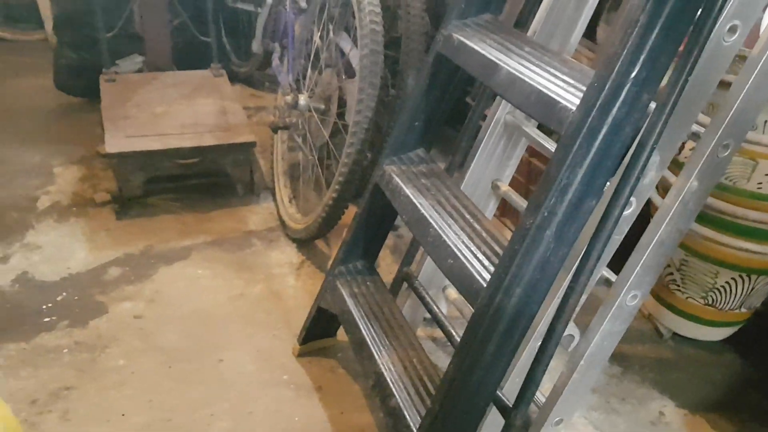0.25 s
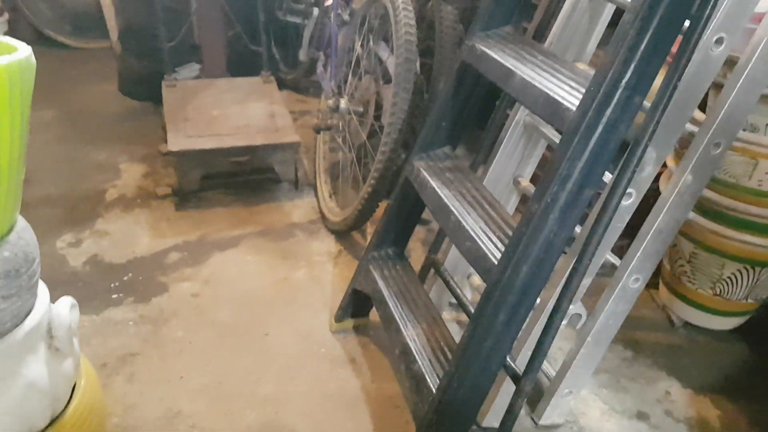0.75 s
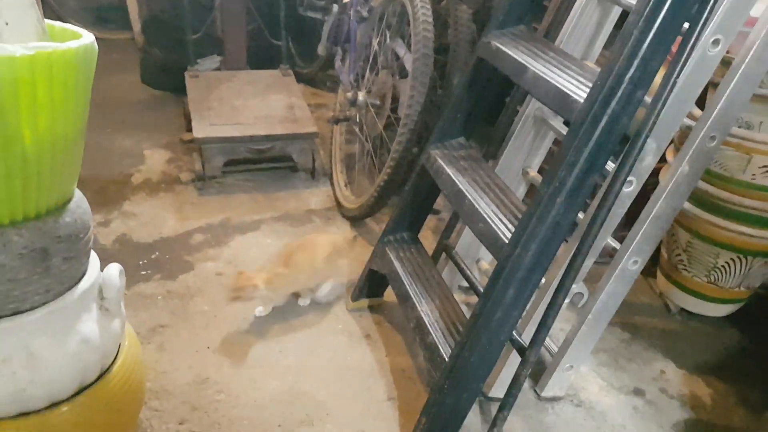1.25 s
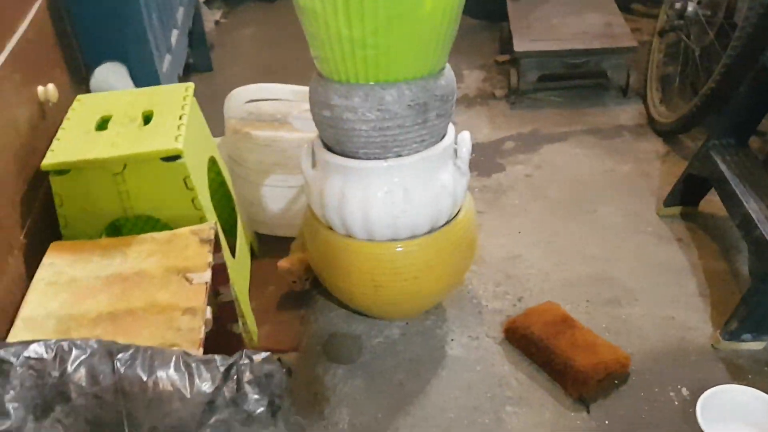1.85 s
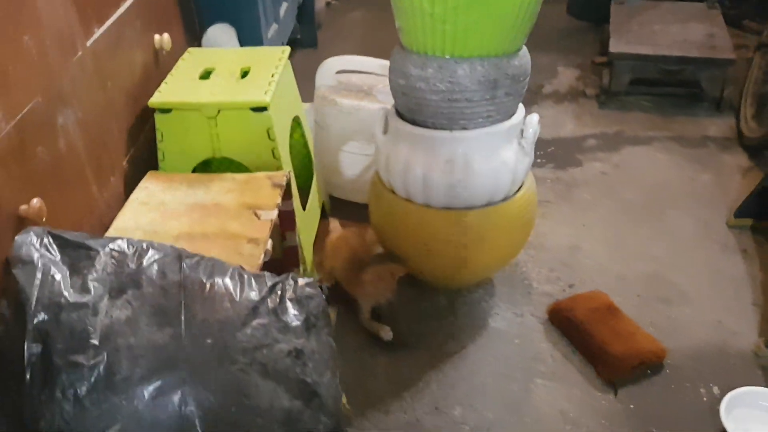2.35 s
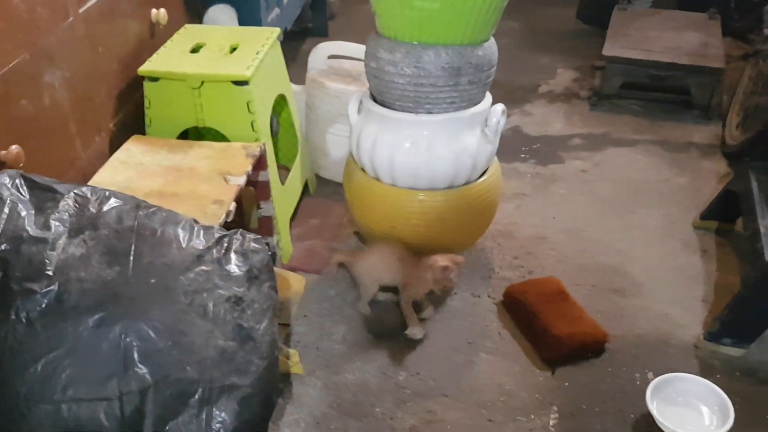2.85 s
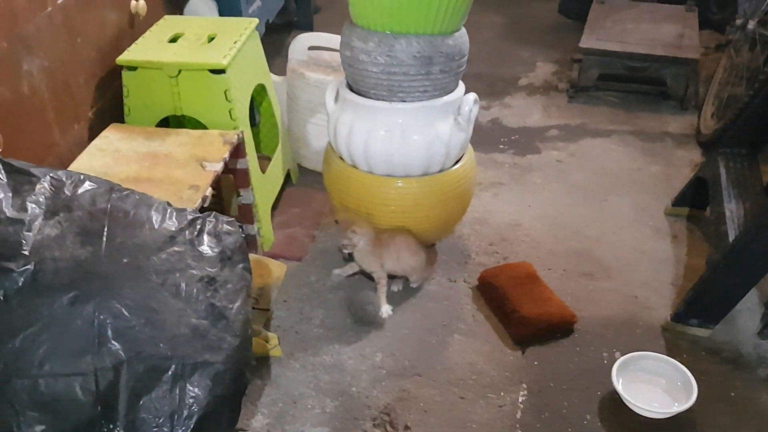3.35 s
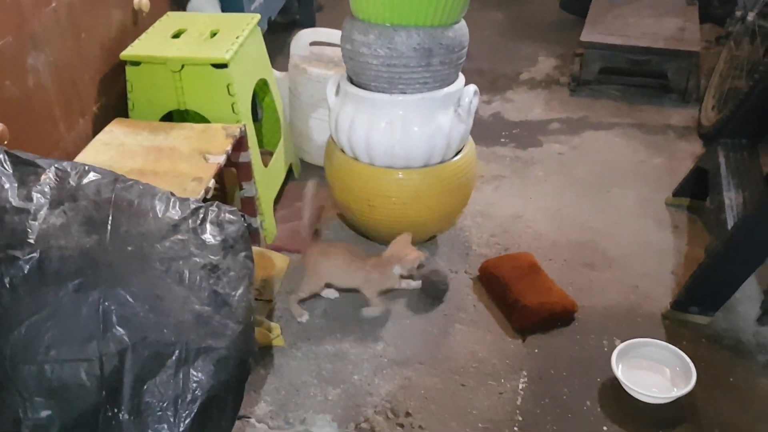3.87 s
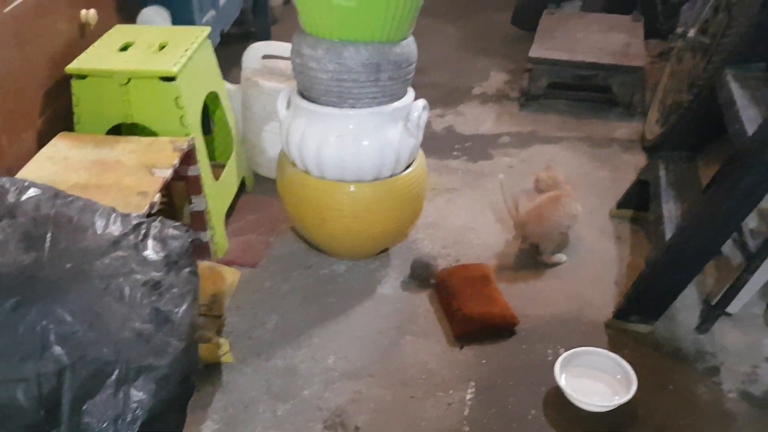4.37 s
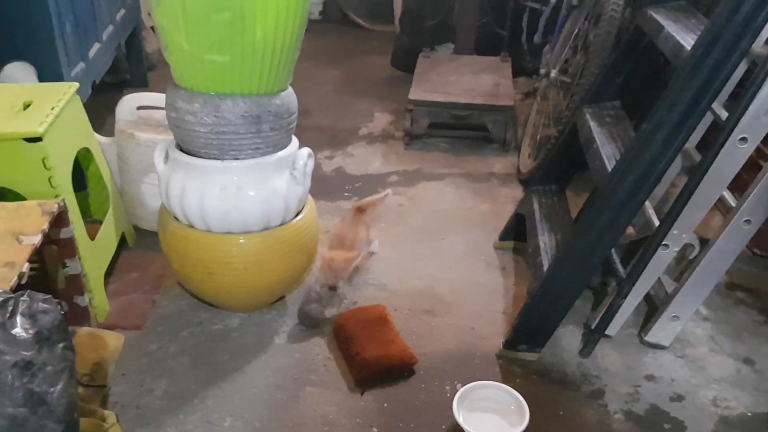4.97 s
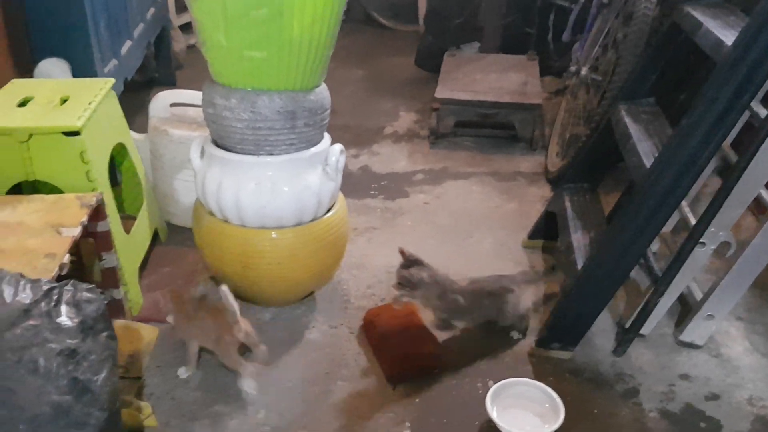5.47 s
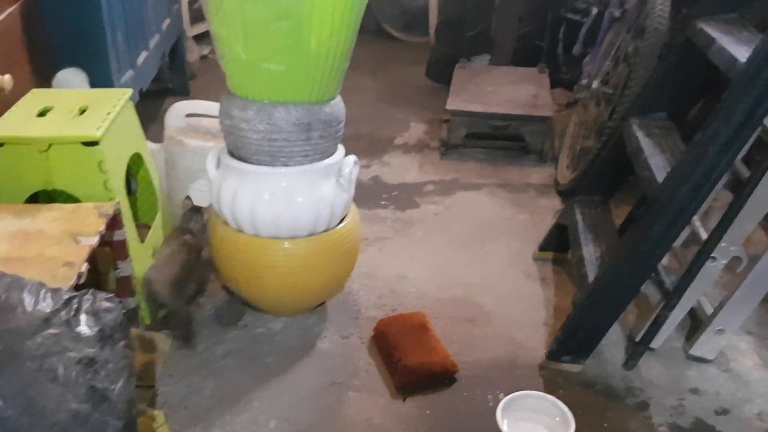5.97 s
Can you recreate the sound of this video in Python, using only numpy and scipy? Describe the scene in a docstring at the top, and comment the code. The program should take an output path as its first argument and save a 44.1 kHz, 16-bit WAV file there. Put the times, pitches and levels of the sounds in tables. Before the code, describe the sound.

Faint taps and scratches of kittens chasing over a gritty floor, ending with two loud knocks, the first ringing, the second dull and booming.

```python
"""Faint room noise, then kittens chasing over the concrete floor of a small, hard-walled storeroom.
Pads and claws tap (short clicks) and scuff on grit (grainy noise bursts); the walls echo them.
Late on, something hollow clatters further off and rings briefly; a dull, booming knock follows.
Both are decaying modes plus bands of noise. A hand-held phone with two ports listens."""
import sys
import numpy as np
from scipy import signal
from scipy.fft import rfft, irfft
from scipy.io import wavfile
from scipy.ndimage import uniform_filter1d

SR = 44100
rng = np.random.default_rng(int(sys.argv[2]) if len(sys.argv) > 2 else 0)


def materialize(psi):
    """Save the field psi as 16-bit PCM at rate SR to the path in sys.argv[1].

    A 1-D psi becomes a single channel; in a 2-D psi each row is a channel.
    """
    bounded = np.clip(np.atleast_2d(psi).T, -1, 1)
    quanta = np.round(bounded * 32767).astype(np.int16)
    wavfile.write(sys.argv[1], SR, quanta)


N = 274125
TIME_S = np.arange(N) / SR
SCUFF_PAN_DB = -2.5


def undb(db):
    """Decibels to gain."""
    return 10 ** (np.asarray(db) / 20)


def unit(x):
    """Scale to rms 1."""
    return x / np.sqrt(np.mean(x ** 2))


def pan(db):
    """Stereo gains for a level difference, left minus right."""
    return undb(np.array([[db], [-db]]) / 2)


def bins_hz(size):
    """FFT bin frequencies, floored at 1 Hz."""
    return np.maximum(np.fft.rfftfreq(size, 1 / SR), 1)


def along(hz, table, column=1):
    """Read one column of a table on a log-frequency axis."""
    rows = np.array(table, float)
    return np.interp(np.log(hz), np.log(rows[:, 0]), rows[:, column])


def add(out, start_s, sound):
    """Mix a sound in at a time."""
    i = int(start_s * SR)
    out[:, i:i + sound.shape[1]] += sound[:, :N - i]


def diffuse(hz, alike_below_hz=510):
    """Spectrum of noise from all round: the two ports agree only on long waves."""
    coherence = 0.92 / (1 + (hz / alike_below_hz) ** 2)
    mid, side = rng.standard_normal((2, len(hz))) + 1j * rng.standard_normal((2, len(hz)))
    return np.sqrt(1 + coherence) * mid + np.sqrt(1 - coherence) * side * np.array([[1], [-1]])


def uneven(hz, depth_db, spacing_hz):
    """Gain with chance peaks and valleys, as from many overlapping resonances."""
    knots = np.arange(256)
    return undb(depth_db * np.interp(hz / spacing_hz, knots, rng.standard_normal(len(knots))))


def hump(hz, centre_hz, octaves):
    """Contact spectrum: a bell on a pink slope, dulled by the phone microphone's dip near 8.5 kHz."""
    # Microphone treble dip. Each row: frequency in Hz, gain in dB.
    mic_colour = [(8200, 2.5), (8900, -3.5), (15000, 4.5)]
    bell = np.exp(-(np.log2(hz / centre_hz) / (2 * octaves)) ** 2)
    return bell / np.sqrt(hz) * undb(along(hz, mic_colour))


def wash(table, size=49152, bands=26):
    """Crowded modes or echoes: noise bands, each swelling and dying at its own pace; energy 1."""
    t, hz = TIME_S[:size], bins_hz(size)
    noise = diffuse(hz) * uneven(hz, depth_db=4.5, spacing_hz=73.7)
    colour = undb(along(hz, table))
    centres_hz = np.geomspace(70, 16000, bands)
    band_index = np.interp(np.log(hz), np.log(centres_hz), np.arange(bands))
    out = 0
    for k, centre_hz in enumerate(centres_hz):
        t60_s, swell_s = along(centre_hz, table, column=2), along(centre_hz, table, column=3)
        weight = colour * np.maximum(1 - abs(band_index - k), 0)
        envelope = -np.expm1(-t / swell_s) * np.exp(-np.log(1000) * t / t60_s)
        band = irfft(noise * weight, size) * envelope
        out = out + band * np.linalg.norm(weight) / np.linalg.norm(band, axis=1, keepdims=True)
    return unit(out) / np.sqrt(size)


def ring(modes, swell_cycles, lag_s, scatter_rad_per_khz):
    """Modes build up, then decay; reflections scatter the phase of short waves at each port."""
    t, out = TIME_S[:SR], 0
    for hz, db, t60_s in modes:
        scatter_rad = scatter_rad_per_khz * min(hz / 1000, 2) * rng.standard_normal()
        port_rad = (scatter_rad + np.pi * hz * lag_s) * np.array([[-1], [1]])
        path_rad = hz / 200 * rng.standard_normal()
        swell = -np.expm1(-(t * hz / swell_cycles) ** 2)
        decay = np.exp(-np.log(1000) * t / t60_s)
        out = out + undb(db) * swell * decay * np.sin(2 * np.pi * hz * t + path_rad + port_rad)
    return out


def tap(centre_hz, octaves, lag_s=0.00006, size=1024):
    """One short contact: a resonant click that reaches the right port first."""
    hz = bins_hz(size)
    gain = hump(hz, centre_hz, octaves)
    # folded cepstrum: minimum phase, no pre-ring
    cepstrum = irfft(np.log(gain / gain.max() + undb(-42)))
    cepstrum[1:size // 2] *= 2
    cepstrum[size // 2 + 1:] = 0
    delay_rad = 2 * np.pi * hz * np.array([[lag_s], [0]])
    click = irfft(np.exp(rfft(cepstrum) - 1j * delay_rad))
    return click / abs(click).max()


def air(level_db=-63.5):
    """Steady room noise: still air and distant rumble."""
    # Noise spectrum. Each row: frequency in Hz, relative density in dB.
    spectrum = [(20, -22), (50, -11), (110, -11), (190, -9.5), (380, -3), (600, -5), (1200, -11.5),
                (1900, -13.5), (2600, -16), (4200, -20.5), (6200, -24), (8100, -20.5), (9000, -30.5),
                (15800, -22)]
    hz = bins_hz(N)
    noise = unit(irfft(diffuse(hz) * undb(along(hz, spectrum)), N))
    return noise * undb(level_db) * pan(-1.9)


def handling(centre_hz=82, octaves=0.58, gain_db=-3.5):
    """Low rumble of the phone shifting in the hand, with a low swell as the clatter strikes near 5.2 s."""
    # Rumble envelope. Each row: time in seconds, relative level in dB.
    levels = [(0.0, -78.5), (1.9, -79), (2.89, -82), (3.73, -69.5), (3.93, -77), (4.85, -73.5), (4.97, -80),
              (5.22, -68), (5.8, -74)]
    hz = bins_hz(N)
    rumble = unit(irfft(diffuse(hz) * hump(hz, centre_hz, octaves), N))
    return rumble * undb(gain_db + np.interp(TIME_S, *np.transpose(levels)))


def room_echo(sound):
    """Hard walls return a dense tail; the treble dies first."""
    # Echo bands. Each row: frequency in Hz, relative density in dB, T60 and swell in seconds.
    echo_bands = [(100, -8, 0.56, .008), (1000, -5.5, 0.6, 0.0089), (5030, -3.5, 0.33, 0.00098),
                  (15500, 5, 0.083, .003)]
    return signal.fftconvolve(sound, wash(echo_bands), axes=1)[:, :N]


def clatter(start_s=5.208, rebound_after_s=0.028, rebound_top_hz=2200, rebound_decay_s=0.037):
    """A hollow thing is struck and rebounds; its ring arrives mostly by way of the walls."""
    # Strong modes. Each row: frequency in Hz, relative level in dB, T60 in seconds.
    modes = [(211, -24, 0.18), (345, -30, 0.33), (406, -30, 0.8), (574, -27, 0.36), (624, -30, 0.36),
             (704, -40, 1.0), (779, -32, 1.0), (835, -28, 0.52), (859, -21, 0.3), (893, -28, 0.43),
             (911, -26, 0.3), (934, -21, 0.3), (967, -32, 0.52), (1048, -25, 0.3), (1123, -20, 0.3),
             (1168, -30, 0.43), (1202, -24, 0.36), (1262, -29, 0.36), (1346, -27, 0.3), (1383, -29, 0.3),
             (1420, -34, 0.65), (1561, -32, 0.36), (1667, -32, 0.3), (1696, -35, 0.52), (1794, -34, 0.36),
             (1823, -36, 0.43), (1888, -34, 0.36), (2096, -36, 0.43), (2122, -34, 0.3), (2260, -34, 0.3)]
    # Weak, crowded modes. Each row: frequency in Hz, relative density in dB, T60 and swell in seconds.
    crowd = [(120, -25, 1, 0.025), (293, -14, 0.99, 0.024), (378, -4, 1, 0.0051), (680, -0.5, 1, 0.0054),
             (1220, 3, 0.72, 0.011), (1950, -5.5, 0.61, 0.038), (2720, -3, 0.49, 0.0032),
             (4600, -16.5, 0.48, 0.009), (8100, -18, 0.5, 0.0013), (8800, -26.5, 0.51, 0.00077),
             (15500, -28.5, 0.61, 0.0009)]
    out = np.zeros((2, N))
    add(out, start_s, undb(1.5) * ring(modes, swell_cycles=18.6, lag_s=0.00016, scatter_rad_per_khz=0.62))
    add(out, start_s, undb(9) * wash(crowd))
    # softer, self-damping contact: no top, short tail
    rebound = signal.sosfilt(signal.butter(2, rebound_top_hz, fs=SR, output="sos"), wash(crowd))
    damping = np.exp(-TIME_S[:rebound.shape[1]] / rebound_decay_s)
    add(out, start_s + rebound_after_s, undb(9) * rebound * damping)
    return out * pan(-1.6)


def thud(start_s=6.0555, crack_hz=2200):
    """A dull knock: a short crack, a low boom that builds up, and a rattle."""
    # Boom modes. Each row: frequency in Hz, relative level in dB, T60 in seconds.
    modes = [(168, -25, 0.33), (192.8, -14.5, 0.31), (460, -47, 0.28), (472, -36, 0.3), (491, -37, 0.23),
             (630, -41, 0.24), (781, -39.5, 0.38)]
    # Rattle bands. Each row: frequency in Hz, relative density in dB, T60 and swell in seconds.
    rattle = [(45, -53, 0.5, .01), (110, -10, 0.46, .01), (250, -7.5, 0.46, 0.014), (454, 3, 0.23, 0.0038),
              (740, -10.5, 0.3, 0.0056), (1060, -12, 0.33, 0.011), (2400, -13.5, 0.32, .001),
              (3180, -23, 0.31, .002), (4130, -36, 0.61, 0.0022), (15500, -54.5, .7, .002)]
    boom = ring(modes, swell_cycles=3.8, lag_s=-0.00021, scatter_rad_per_khz=0.24)
    out = np.zeros((2, N))
    add(out, start_s, undb(-1) * boom)
    add(out, start_s, undb(1) * wash(rattle))
    add(out, start_s + 0.0011, undb(-32) * tap(crack_hz, octaves=0.25))
    return out * pan(-1.6)


def scuff(length_s, centre_hz, octaves, grain_db=2.5, attack_share=0.045, size=16384):
    """A paw slides: grit catches quickly and unevenly, then lets go."""
    hz = bins_hz(size)
    progress = TIME_S[:size] / length_s
    roughness = unit(uniform_filter1d(rng.standard_normal(size), size=50))
    grains = unit(undb(grain_db * roughness))
    colour = hump(hz, centre_hz, octaves) * uneven(hz, depth_db=2.5, spacing_hz=218.4)
    envelope = -np.expm1(-progress / attack_share) * np.exp(-progress ** 2.34)
    return unit(irfft(diffuse(hz) * colour)) * grains * envelope


def crunch(click, grit_db=-1, decay_s=0.0061, size=1024):
    """Grains under the pad repeat a contact for a few milliseconds."""
    grains = rng.standard_normal((2, size)) * np.exp(-TIME_S[:size] / decay_s)
    grains *= undb(grit_db) / np.linalg.norm(grains, axis=1, keepdims=True)
    grains[:, 0] += 1  # the contact itself
    return undb(-3) * signal.fftconvolve(click, grains, axes=1)


def width_share(hz, pad_below_hz=1710):
    """Share of full bandwidth: soft pads are low and narrow, claws high and broad."""
    return min(hz / pad_below_hz, 1)


def scamper(level_db=-77, spread_db=5, centre_hz=4300, spread_octaves=0.55, count=60):
    """Light claw scratches at random times and pitches."""
    starts_s = rng.uniform(0.46, 6, count)
    out = np.zeros((2, N))
    for start_s, (force, pitch) in zip(starts_s, rng.standard_normal((count, 2))):
        hz = np.clip(centre_hz * 2 ** (spread_octaves * pitch), 1000, 8000)
        scratch = scuff(length_s=0.017, centre_hz=hz, octaves=0.16, size=4096)
        add(out, start_s, undb(level_db + spread_db * force) * scratch)
    return out * pan(-1.5)


def gallop(start_s=4.015, stride_s=0.11, level_db=-67, spread_db=1, strides=4):
    """A kitten bounds in light, even strides, one scuff each."""
    out = np.zeros((2, N))
    for k, force in enumerate(rng.standard_normal(strides)):
        step = scuff(length_s=0.046, centre_hz=3300, octaves=1, size=8192)
        add(out, start_s + k * stride_s, undb(level_db + spread_db * force) * step)
    return out * pan(SCUFF_PAN_DB)


def slides(scuff_octaves=1.27, scratch_octaves=0.24, squeak_octaves=0.066, squeak_db=-68):
    """Sliding friction: broad paw scuffs, narrower claw scratches, thin squeaks."""
    # Paws on grit. Each row: start and length in seconds, level in dB, pitch in Hz.
    scuffs = [(0.62, 0.2, -61, 1560), (0.754, 0.06, -53.5, 1630), (1.246, 0.17, -65.5, 2400),
              (1.634, 0.16, -63, 1690), (1.804, 0.056, -58.5, 1970), (2.258, 0.1, -64.5, 1690),
              (2.406, 0.11, -64, 3400), (2.604, 0.12, -63.5, 1690), (2.673, 0.072, -54.5, 1910),
              (3.069, 0.048, -64, 2400), (3.432, 0.06, -60, 4470), (3.564, 0.07, -59, 4870),
              (3.773, 0.05, -53.5, 2350), (3.897, 0.06, -61.5, 3240), (4.553, 0.084, -63, 3900),
              (4.649, 0.1, -59, 4400), (5.106, 0.072, -55.5, 3380), (5.144, 0.038, -55, 580),
              (5.775, 0.014, -52.5, 380), (5.865, 0.038, -55.5, 1800), (5.999, 0.15, -47, 700)]
    # Dragged claws. Each row: start and length in seconds, level in dB, pitch in Hz.
    scratches = [(2.179, 0.043, -55.5, 5830), (3.671, 0.031, -64, 6650)]
    # Things being brushed. Each row: start and length in seconds, pitch in Hz.
    squeaks = [(0.1, 0.021, 3350), (2.074, 0.036, 2560), (2.615, 0.14, 2740), (3.077, 0.027, 3060),
               (3.246, 0.021, 2990), (5.845, 0.029, 2850)]
    out = np.zeros((2, N))
    for start_s, length_s, db, hz in scuffs:
        add(out, start_s, undb(db) * scuff(length_s, hz, scuff_octaves * width_share(hz)))
    for start_s, length_s, db, hz in scratches:
        add(out, start_s, undb(db) * scuff(length_s, hz, scratch_octaves))
    for start_s, length_s, hz in squeaks:
        add(out, start_s, undb(squeak_db) * scuff(length_s, hz, squeak_octaves))
    return out * pan(SCUFF_PAN_DB)


def footfalls(octaves=0.63, pan_db=-3.5):
    """Pads and claws strike gritty concrete; returns direct sound and echo send."""
    # Floor taps. Each row: start in seconds, relative level in dB, pitch in Hz, echo send in dB.
    taps = [(0.4196, -35.5, 6000, -1.5), (0.624, -46, 1630, 6), (0.6609, -37.5, 1050, -16),
            (0.7698, -37.5, 1470, 4), (0.7729, -37, 1300, -6), (1.2463, -40, 1680, 6),
            (1.3975, -41.5, 8500, 7), (1.746, -42, 1570, 5), (1.814, -46, 2200, -9),
            (1.845, -46.5, 1200, -12), (2.4165, -39.5, 13000, -14), (2.678, -34, 3280, 6),
            (2.68, -50.5, 523, 3), (2.9158, -41.5, 2830, 5), (3.3663, -45.5, 1120, -13),
            (3.776, -47, 553, 4), (3.905, -49, 1280, -11), (4.182, -46.5, 970, -12),
            (5.1067, -32.5, 5000, -2), (5.118, -42, 1110, -3), (5.7747, -49.5, 900, -2),
            (6.003, -47, 750, 5), (6.039, -40.5, 1250, 18)]
    direct, send = np.zeros((2, 2, N))
    for start_s, db, hz, send_db in taps:
        click = undb(db) * crunch(tap(hz, octaves * width_share(hz)))
        add(direct, start_s, click * pan(pan_db))
        add(send, start_s, click * undb(send_db))
    return direct, send


def paws(slide_send_db=-4):
    """The chase: taps and slides over light running, all echoed by the room."""
    running = scamper() + gallop()
    tapping, tap_send = footfalls()
    sliding = slides()
    send = running + tap_send + sliding * undb(slide_send_db)
    return running + tapping + sliding + room_echo(send[:1])


def scene():
    """Paws, two knocks, room noise and the holding hand."""
    return paws() + clatter() + thud() + air() + handling()


def record(dry, top_hz=15850, dc_offset=-0.0004):
    """The phone cuts the top; its signal rests slightly off zero."""
    lowpass = signal.ellip(10, 0.2, 80, top_hz, fs=SR, output="sos")
    return signal.sosfilt(lowpass, dry + dc_offset)


dry = scene()
out = record(dry)
materialize(out)
```